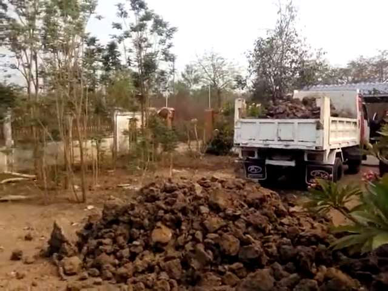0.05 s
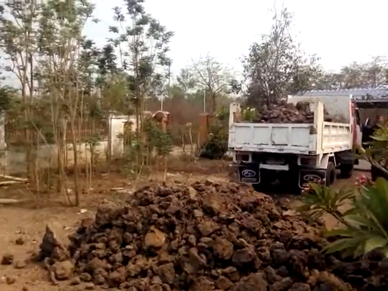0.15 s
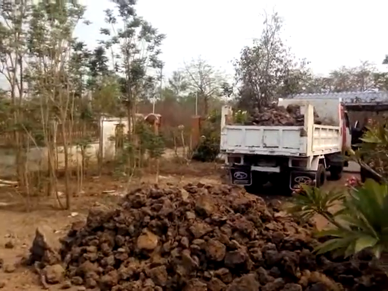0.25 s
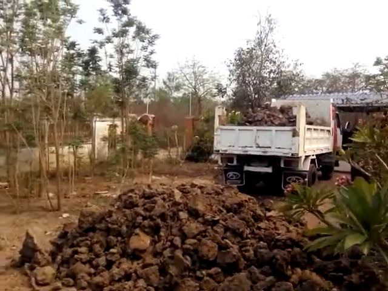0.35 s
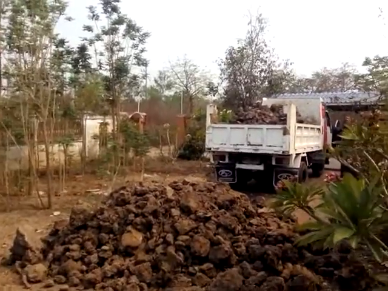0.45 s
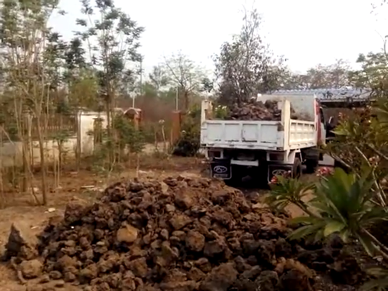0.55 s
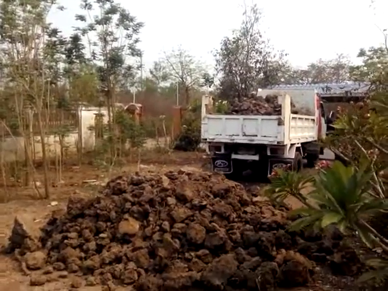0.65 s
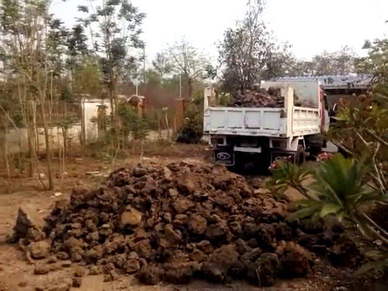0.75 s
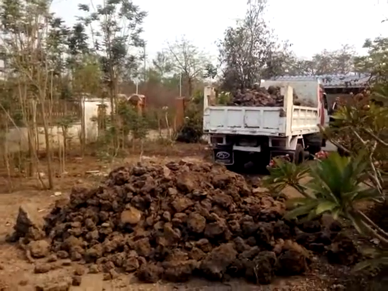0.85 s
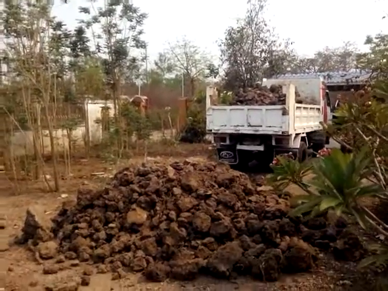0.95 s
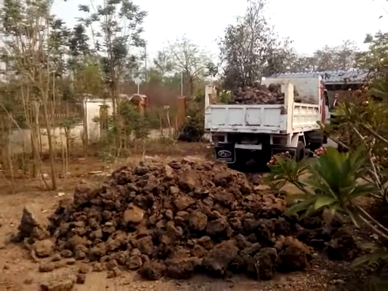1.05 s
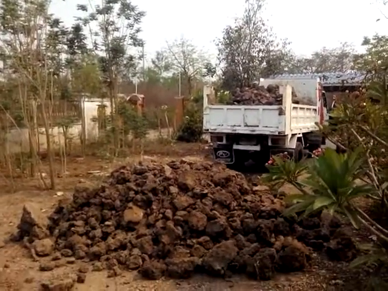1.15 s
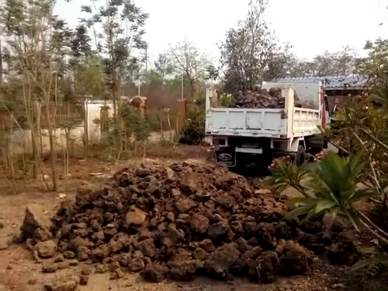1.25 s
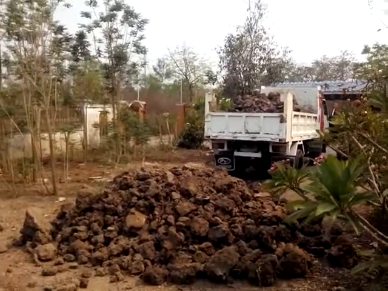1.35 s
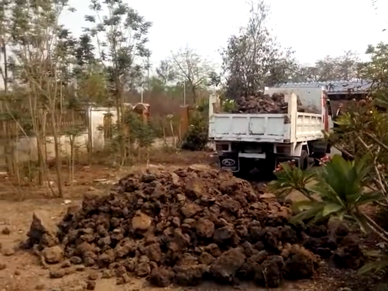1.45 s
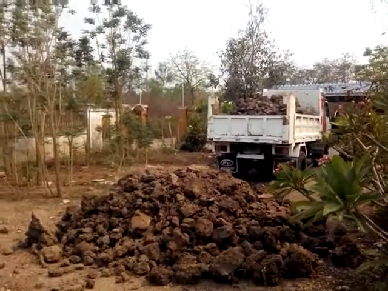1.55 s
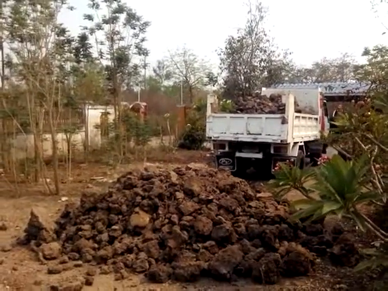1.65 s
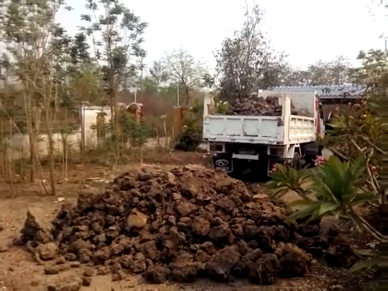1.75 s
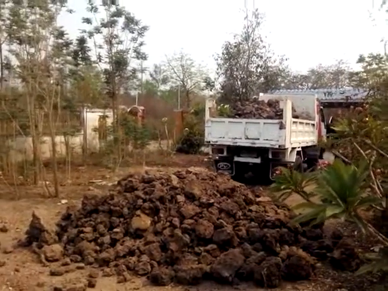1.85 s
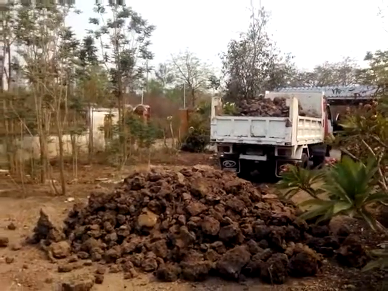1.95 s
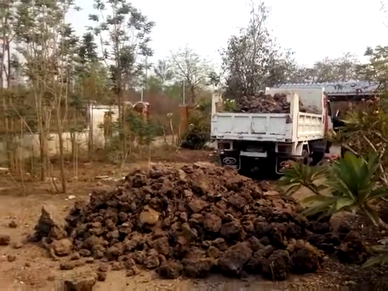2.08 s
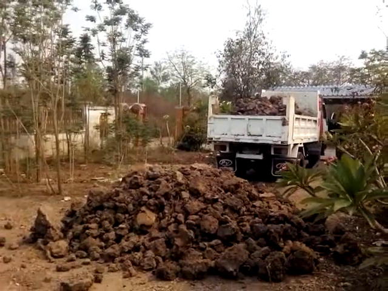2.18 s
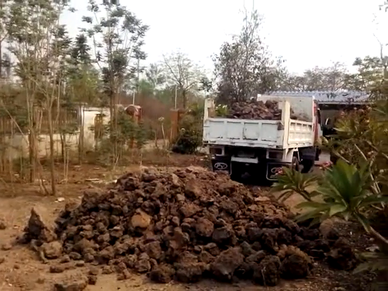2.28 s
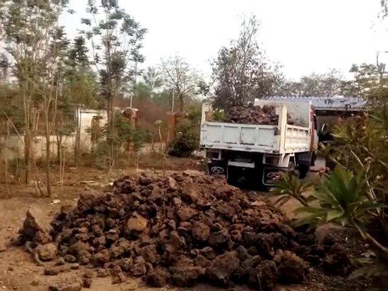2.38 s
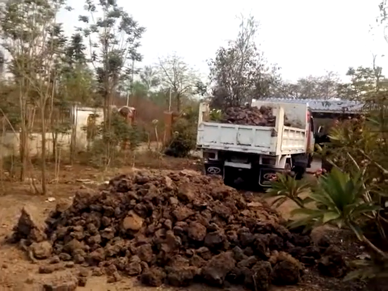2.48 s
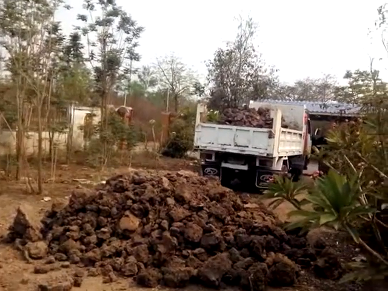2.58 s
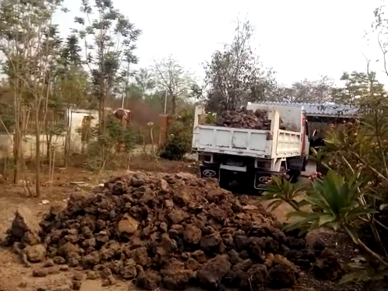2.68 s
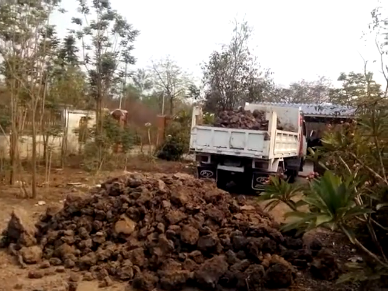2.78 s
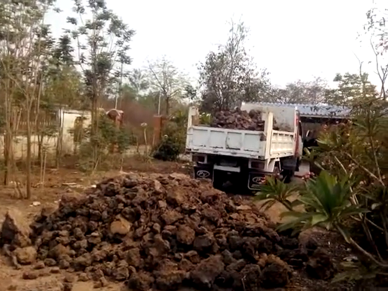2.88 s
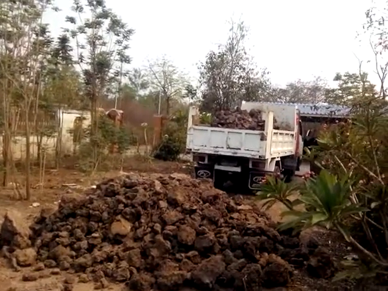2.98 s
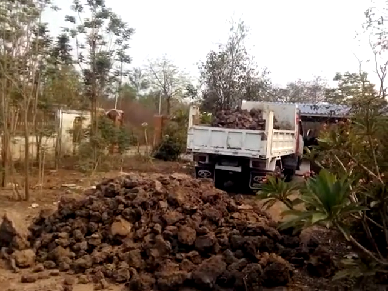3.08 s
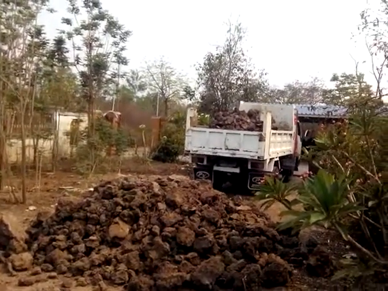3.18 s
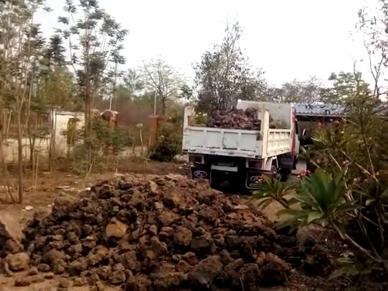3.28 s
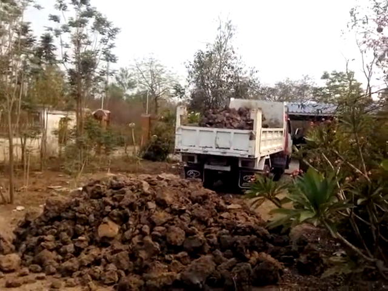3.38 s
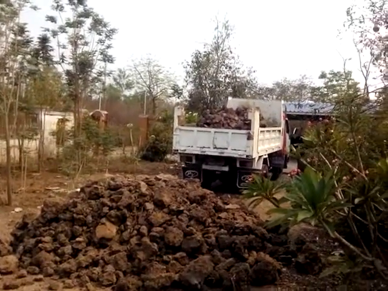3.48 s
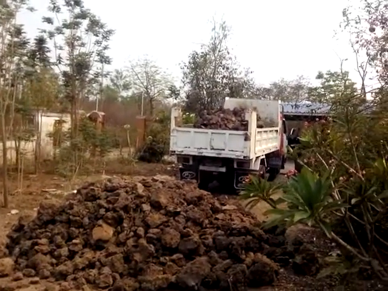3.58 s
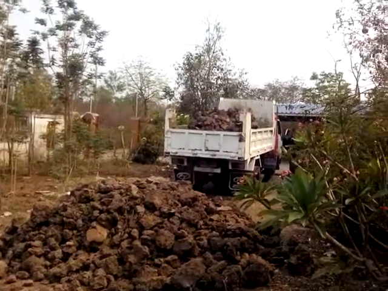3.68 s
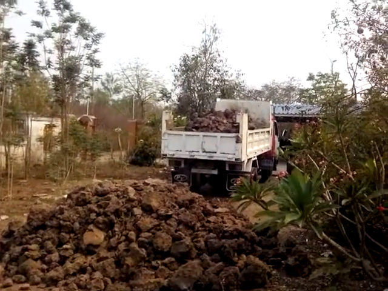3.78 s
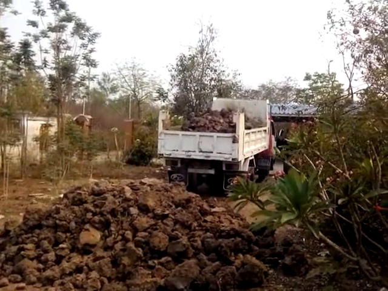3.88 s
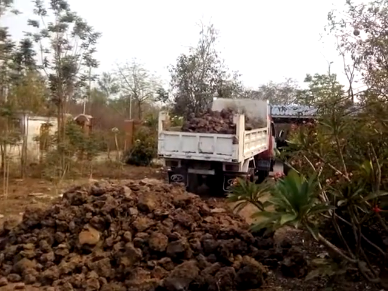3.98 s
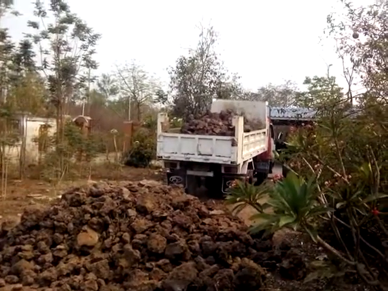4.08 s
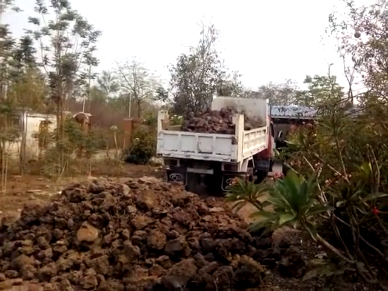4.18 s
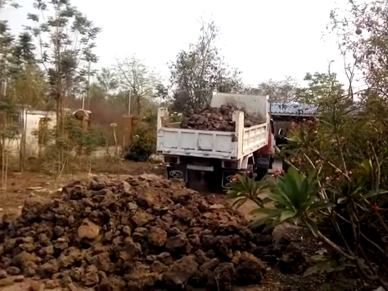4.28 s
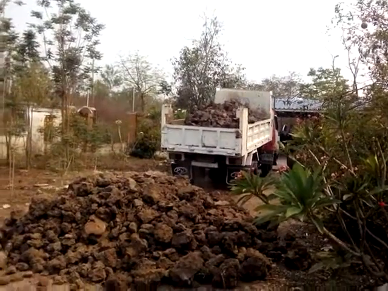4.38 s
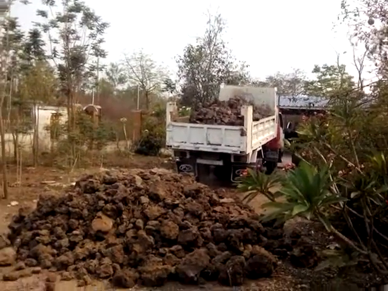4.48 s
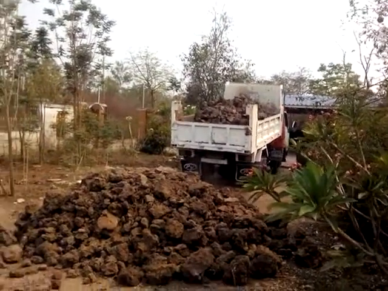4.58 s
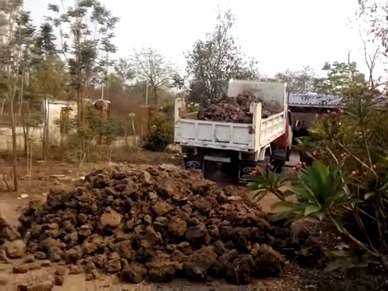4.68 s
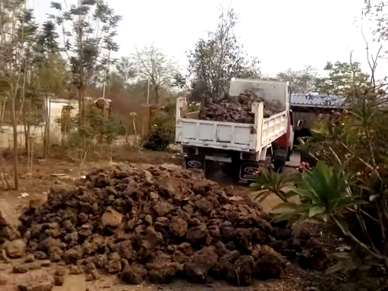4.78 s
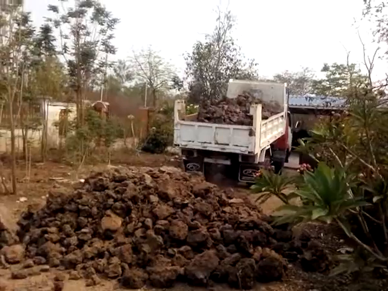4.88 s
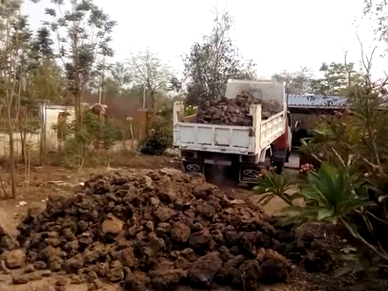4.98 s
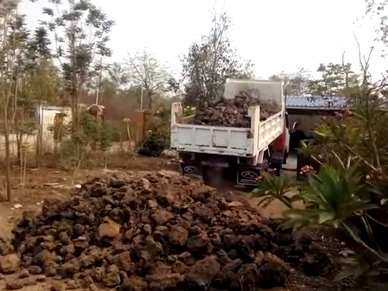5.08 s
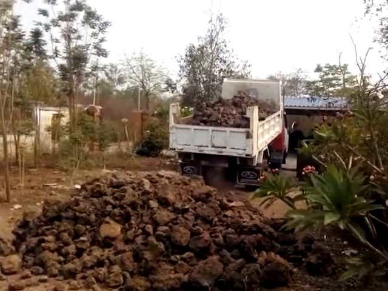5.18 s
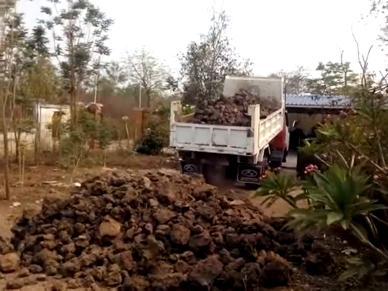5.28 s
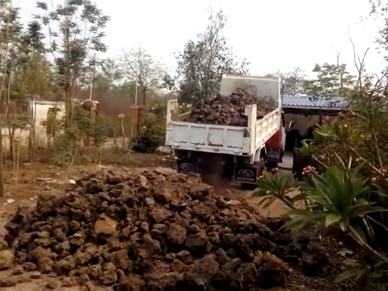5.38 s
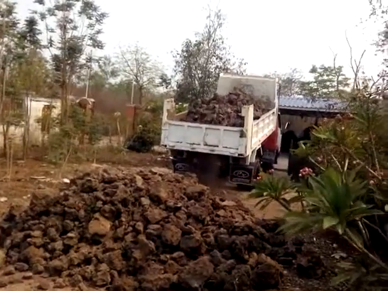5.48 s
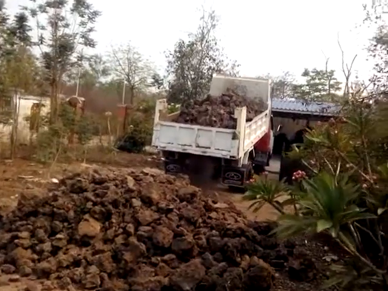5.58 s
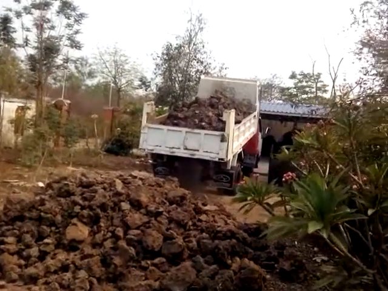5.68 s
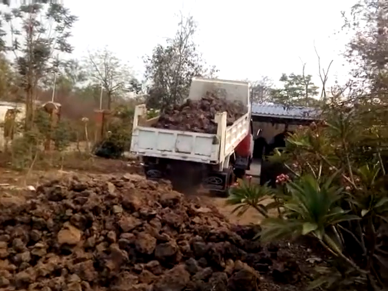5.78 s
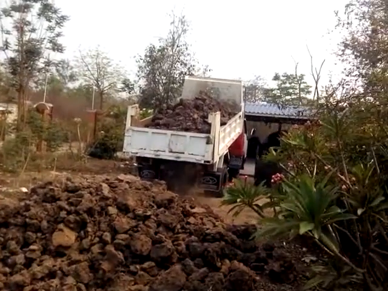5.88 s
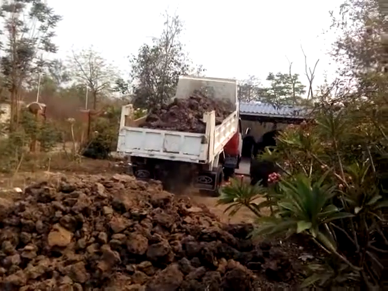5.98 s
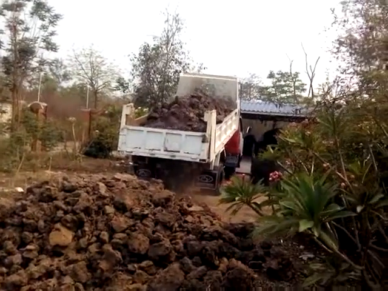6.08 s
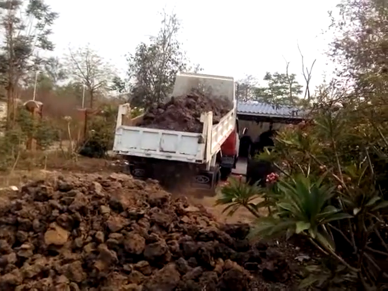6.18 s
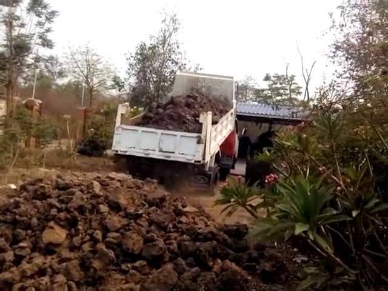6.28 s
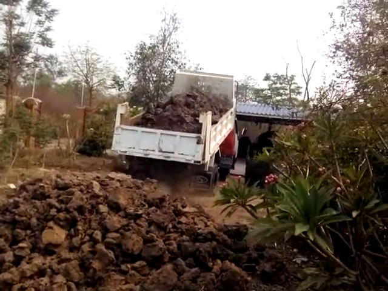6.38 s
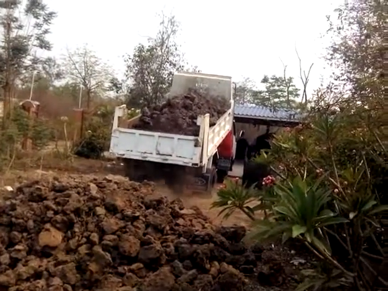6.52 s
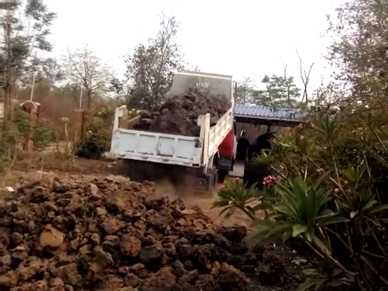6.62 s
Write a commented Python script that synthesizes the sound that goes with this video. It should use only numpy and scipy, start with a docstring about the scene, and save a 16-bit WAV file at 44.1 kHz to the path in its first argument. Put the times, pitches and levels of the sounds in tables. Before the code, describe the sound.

A dump truck's diesel engine runs some way off in an outdoor yard. It starts at a low, chugging idle, with a soft hiss for the first 0.7 seconds. The idle then lopes unevenly, with a faint pulsing squeak until about 1.4 seconds and small dry ticks near 1.1 and 1.9 seconds. Around 2 seconds the engine picks up slightly, with a few faint high swishes. From about 2.7 to 3.7 seconds it revs up strongly, growing louder and higher, while the steel bed gives a quick run of rattling knocks. The engine then holds a fast, booming drone with clatter and hiss as the bed lifts, creeping a little higher in pitch. Thin high buzzes come and go near 3.4 seconds, from 4.4 to 5.2, and from 5.9 on. One more metal knock comes near 5.1 seconds. The engine is still running hard at the end, about 6.6 seconds.

```python
"""Dump truck revving for its hoist

A six-cylinder diesel lopes at idle some way off in a yard, then revs up and holds speed for the hoist.
The exhaust booms on the first multiples of the firing rate; unequal cylinders chug between them.
The block clatters and hisses, and the loaded steel bed rattles as it starts to lift.
Broad hiss and sizzle open the scene; narrow buzzes come and go later."""
import sys
import numpy as np
from scipy import signal
from scipy.fft import rfft, irfft, next_fast_len
from scipy.io import wavfile
from scipy.ndimage import uniform_filter1d, minimum_filter1d, map_coordinates

SR = 44100
rng = np.random.default_rng(int(sys.argv[2]) if len(sys.argv) > 2 else 0)


def store_wav(level_fs):
    """Save 16-bit WAV to argv[1]."""
    pcm = np.round(np.clip(np.atleast_2d(level_fs), -1, 1) * 32767)
    wavfile.write(sys.argv[1], SR, pcm.T.astype(np.int16))


N = 293265
TIME = np.arange(N) / SR

# engine speed: t/s, firing rate/Hz
FIRING_RATE = [(0.0, 33.4), (0.15, 33.8), (0.39, 33.7), (0.5, 34.2), (0.96, 32.3), (1.61, 32.6),
               (1.8, 32.1), (2.02, 34.8), (2.15, 37.6), (2.26, 39.1), (2.74, 39.2), (3.02, 47.7),
               (3.15, 53.3), (3.35, 61.6), (3.46, 68.1), (3.59, 74.8), (3.7, 76.6), (4.56, 87.2),
               (4.74, 88.8), (5.0, 88.0), (5.3, 95.1), (5.68, 92.0), (5.87, 92.7), (6.65, 97.1)]
# engine effort: t/s, load (0 idle, about 1 full), chug gain/dB
EFFORT = [(.5, 0.043, -27.5), (.9, 0.023, -30), (1.82, 0.035, -29), (1.95, 0.3, -28.5), (2.15, 0.52, -21.5),
          (2.6, 0.67, -21.5), (2.85, 0.7, -15.5), (3.1, 1.03, -24), (3.28, 1.09, -18), (3.75, 0.87, -20.5),
          (4.6, 1.02, -17), (5.05, 1.12, -20.5), (5.3, 1, -22.5), (6, 1.046, -26), (6.65, 0.94, -21.5)]
# firing orders 1-6 ahead of the pipe: idle level/dB, full-load level/dB
ORDER_LEVELS = [(-32, -18.5), (-43, -20), (-47, -23), (-34, -24.5), (-48.5, -31.5), (-58.5, -31.5)]
# tailpipe and silencer: f/Hz, gain/dB
PIPE_RESPONSE = [(25, -36), (45, -18.5), (65, -2.5), (98, 8.5), (125, -4), (165, 2.5), (195, -4.5),
                 (235, -2), (275, -11.5), (315, -6), (385, -22.5), (465, -15.5), (540, -38), (900, -51.5)]
# standing waves in the pipe: f/Hz, width/Hz, gain/dB
PIPE_WAVES = [(52, 12, -16), (54.2, 49.8, 18.5), (87.16, 5.1, -7.5), (122.7, 7.2, -10), (141.1, 61, 13),
              (149.3, 9.2, -13.5), (176.5, 2.2, -4.5), (280, 10, 2.5), (350, 12, 8)]
# unequal cylinders, lines 1, 2 and 3 sixths of the firing rate off an order: gain/dB
IMBALANCE_DB = [-3.4, -9, 0.92]
# exhaust sag once per engine cycle: t/s, depth/dB
LOPE_DEPTH = [(.45, 1), (.9, 10), (1.7, 10.5), (2.1, 4), (3.3, 1), (4.9, -1), (5.4, 0.7)]
# combustion harshness: t/s, level/dB
KNOCK_LEVEL = [(0.0, -38), (0.18, -36), (0.67, -36), (0.85, -42.5), (2.8, -37), (2.83, -32.5), (3.15, -31),
               (3.33, -22), (3.37, -26.5), (3.59, -24), (3.7, -29), (4.41, -27), (4.44, -23), (5.18, -27),
               (5.35, -30.5), (6.15, -32), (6.63, -29.5), (6.65, -27)]
# block drone: f/Hz, level/dB
DRONE_SPECTRUM = [(60, -28), (250, 10), (440, -2), (550, -7), (660, -5.5), (770, -6.5), (900, -6),
                  (1150, -6), (1500, -6), (2100, -26.5), (4000, -62.5)]
# hollow chassis growl: f/Hz, level/dB
GROWL_SPECTRUM = [(520, -19), (690, 7.5), (880, 3.5), (1120, -27.5)]
# injection clatter: f/Hz, level/dB
CLATTER_SPECTRUM = [(700, -41.5), (1300, -21), (1650, -0.5), (1870, -4), (2050, 1), (2300, 2.5), (2650, 3),
                    (3100, 1), (3700, 2), (4300, -4), (5200, -12.5), (7500, -52.5)]
# fan hiss and swishes: f/Hz, level/dB
HISS_SPECTRUM = [(2500, -43), (3900, -13), (4600, 3), (5200, 1), (5900, -2.5), (6500, -6), (7200, -17.5),
                 (7800, -47.5)]
# sheet-metal resonances: f/Hz, width/Hz, gain/dB
PANEL_MODES = [(795, 5, 11), (873, 27, 1.5), (1798, 24, 9.5), (1910, 23, 8.5), (2206, 17, 4.5),
               (2400, 73, 3.5), (2720, 51, 1), (2640, 26, 1), (2815, 32, 7.5), (3120, 29, 7.5),
               (3330, 11, 10), (3540, 18, 2.5), (4280, 23, 8.5), (5630, 53, 4.5), (5980, 45, 7)]
# stereo width: f/Hz, side minus mid/dB
STEREO_WIDTH = [(100, -30), (300, -15.5), (500, -13), (900, -8.5), (1500, -7), (2500, -11.5), (3600, -5.5),
                (4400, 0.5), (5500, 2), (7200, 8)]
# stereo balance: f/Hz, left minus right/dB
STEREO_BALANCE = [(100, 8), (500, 0.5), (1500, 2), (2700, 2), (4200, 1.5), (5200, -7.5), (7200, -4)]
# bed and tailgate blows: t/s, level/dB
BED_BLOWS = [(1.668, -39.5), (2.263, -39), (2.823, -31.5), (2.865, -37), (2.961, -31), (3.194, -33),
             (3.229, -25.5), (3.296, -27), (3.328, -25), (3.394, -31), (3.481, -28.5), (5.141, -33)]
# bed steel: f/Hz, level/dB
STEEL_SPECTRUM = [(800, -33.5), (1500, -23), (1850, 3), (2100, 9.5), (2400, -6.5), (3100, 5.5), (4200, 1),
                  (6000, -12.5), (7500, -47.5)]
# fluttering noise, broad hiss and sizzle first, then narrow buzzes:
# start/s, end/s, f/Hz, width/Hz, level/dB
FLUTTER_BANDS = [(0, .72, 3820, 610, -45), (.05, 0.651, 5500, 990, -49.5), (1.297, 2.55, 794.5, 10, -53),
                 (2.17, 2.847, 425, 45, -47), (3.285, 3.62, 3080, 94, -34.5), (4.437, 5.22, 3015, 68, -42),
                 (6.25, 6.7, 2960, 250, -37.5), (5.897, 6.7, 3530, 310, -42.5)]
# high swishes: t/s, level/dB
SWISH_EVENTS = [(1.234, -41), (1.69, -46), (2.454, -41.5), (2.603, -42), (2.737, -42.5)]
# dry ticks: t/s, gain/dB
TICK_EVENTS = [(1.1033, -29), (1.92, -36.5)]
# modes of a tick: f/Hz, gain/dB, t60/s
TICK_RING = [(630, -13.5, .008), (1055, 12.5, 0.0062), (1370, -6, .008)]


def exhaust_boom(firings, rate_hz, load, waver_db=1.0, dispersion_rad=0.694):
    """Firing orders grow with load and glide through the pipe resonances."""
    total = np.zeros(N)
    for k, (idle_db, loaded_db) in enumerate(ORDER_LEVELS, 1):
        db = idle_db + load * (loaded_db - idle_db)
        db += along(PIPE_RESPONSE, k * rate_hz) + peaks_db(PIPE_WAVES, k * rate_hz)
        db += waver_db * np.sqrt(k) * wobble(21)
        lag_rad = dispersion_rad * (k - 1) ** 2  # the pipe delays higher orders, smearing each puff
        total += amp(db) * np.cos(2 * np.pi * k * (firings - .4) - lag_rad)
    return total


def exhaust_chug(firings, rate_hz, knock_db, scatter=.1, gas_db=-22):
    """Unequal puffs repeat every six firings: lines at sixths of the firing rate, over rushing gas."""
    pace = rate_hz / rate_hz.max()
    bark_db = 8.5 * (pace - 1) + 0.66 * knock_db  # fast, harsh puffs have sharper edges
    cycle = np.exp(2j * np.pi * firings / 6)
    phasor, lines = np.ones(N, complex), np.zeros(N)
    knots_s = np.linspace(0, TIME[-1], int(TIME[-1] * 16))
    for k in range(1, 46):
        phasor = phasor * cycle
        hz, offset = k * rate_hz / 6, min(k % 6, -k % 6)
        if offset:
            bark_share = along([(180, 0.27), (320, 0.96)], hz)
            db = IMBALANCE_DB[offset - 1] + along(PIPE_RESPONSE, hz) + bark_share * bark_db
            draws = rng.standard_normal(len(knots_s)) + 1j * rng.standard_normal(len(knots_s))
            drift = scatter / pace * np.interp(TIME, knots_s, draws)  # slow puffs vary more
            strength = np.exp(2j * np.pi * rng.random()) + drift
            lines += amp(db) * np.real(strength * phasor)
    lines /= np.sqrt(np.abs(uniform_filter1d(lines ** 2, SR // 3)))
    gas = unit(filtered(rng.standard_normal(N), lambda hz: amp(along(PIPE_RESPONSE, hz))))
    return lines + amp(gas_db) * gas


def stumble(firings, weakest_firing=1.57):
    """Pulse from 0 to 1 every six firings, at the weakest cylinder."""
    return np.abs(np.cos(np.pi * (firings - weakest_firing) / 6)) ** 2.5


def lope(firings):
    """Exhaust gain, mean near 1, sagging with the stumble; deepest at slow idle."""
    depth_db, = curves(LOPE_DEPTH)
    gain = amp(-depth_db * stumble(firings))
    return gain / uniform_filter1d(gain, SR // 2)


def combustion_beat(firings, rate_hz, decay_s=0.025, scatter_db=0.5, steady_share=0.5):
    """Envelope of one burst per firing over a steady floor; bursts merge at speed."""
    age_s = firings % 1 / rate_hz
    sizes = amp(scatter_db * rng.standard_normal(int(firings[-1]) + 1))
    power = (sizes[firings.astype(int)] * np.exp(-age_s / decay_s)) ** 2
    power /= np.abs(uniform_filter1d(power, SR // 4)) + 1e-9
    return np.sqrt(steady_share + (1 - steady_share) * power)


def engine_bay(firings, rate_hz, knock_db, cruise_hz=80):
    """Block drone, chassis growl, injection clatter and fan hiss, all growing with the knock."""
    octaves = np.log2(rate_hz / cruise_hz)
    beat = combustion_beat(firings + .7, rate_hz)
    drone = amp(-34 + 0.67 * knock_db + 0.1 * octaves) * panel_noise(DRONE_SPECTRUM)
    growl = amp(-40.5 + 0.67 * knock_db + 5.5 * octaves) * panel_noise(GROWL_SPECTRUM)
    jitter_db = 1.2 * wobble(220)  # valves and linkages tick unevenly
    clatter = amp(-32 + 0.85 * knock_db + 0.6 * wobble(25) + jitter_db) * panel_noise(CLATTER_SPECTRUM)
    hiss = amp(-41 + 0.8 * knock_db + .5 * jitter_db) * panel_noise(HISS_SPECTRUM)
    return beat * (drone + growl + clatter) + np.sqrt(beat) * hiss


def bed_rattle(crack_t60_s=.03, rattle_t60_s=.12):
    """Loose steel knocks: a sharp crack, then a short bright rattle."""
    envelope = np.zeros(N)
    for start_s, db in BED_BLOWS:
        age_s = np.abs(TIME - start_s)
        crack = 1.1 * amp(-60 * age_s / crack_t60_s)
        rattle = amp(-60 * age_s / rattle_t60_s)
        envelope += (TIME >= start_s) * amp(db) * (crack + rattle)
    return envelope * panel_noise(STEEL_SPECTRUM)


def flutter_band(start_s, end_s, centre_hz, width_hz, db, fade_s=.02, flutter_db=2.2):
    """Band of fluttering noise: hiss or sizzle when broad, a buzz when narrow."""
    shape = lambda hz: 1 / (1 + (2 * (hz - centre_hz) / width_hz) ** 2)
    band = unit(filtered(rng.standard_normal(N), shape))
    gate = np.clip(np.minimum(TIME - start_s, end_s - TIME) / fade_s + .5, 0, 1)
    return gate * amp(db + flutter_db * wobble(30)) * band


def mount_squeak(firings):
    """A mount squeaks with each stumble at slow idle."""
    squeak = flutter_band(start_s=.72, end_s=1.42, centre_hz=2590, width_hz=120, db=-46.5)
    return stumble(firings) * squeak


def swishes(sigma_s=.018):
    """Brief swells of high rustle as the engine leaves idle."""
    envelope = sum(amp(db) * np.exp(-.5 * ((TIME - at_s) / sigma_s) ** 2) for at_s, db in SWISH_EVENTS)
    return envelope * panel_noise(HISS_SPECTRUM)


def ticks():
    """Small, heavily damped clicks close by."""
    t = np.arange(SR // 20) / SR
    ring = sum(amp(db - 60 * t / t60_s) * np.sin(2 * np.pi * hz * t) for hz, db, t60_s in TICK_RING)
    blows = np.zeros(N)
    for at_s, db in TICK_EVENTS:
        blows[round(at_s * SR)] = amp(db)
    return signal.fftconvolve(blows, ring)[:N]


def panel_noise(spectrum):
    """Stereo noise coloured by sheet metal; mid at rms 1, wider in the treble."""
    def colour(hz):
        mid_side = amp(np.outer([0, 1], along(STEREO_WIDTH, hz)))
        return amp(along(spectrum, hz) + peaks_db(PANEL_MODES, hz)) * mid_side

    mid, side = filtered(rng.standard_normal((2, N)), colour)
    balance = lambda hz: amp(np.outer([.5, -.5], along(STEREO_BALANCE, hz)))
    pair = filtered(np.array([mid + side, mid - side]), balance)
    return pair / np.std(pair.mean(axis=0))


def amp(db):
    """dB to gain."""
    return 10 ** (np.asarray(db) / 20)


def unit(x):
    """Scale to rms 1."""
    return x / np.sqrt(np.mean(x ** 2) + 1e-20)


def along(points, hz):
    """Interpolate (f/Hz, value) points on a log axis."""
    knots_hz, values = np.transpose(points)
    return np.interp(np.log(hz + 1), np.log(knots_hz + 1), values)


def peaks_db(rows, hz):
    """Summed resonance peaks and dips."""
    return sum(db / (1 + (2 * (hz - centre_hz) / width_hz) ** 2) for centre_hz, width_hz, db in rows)


def curves(rows):
    """Per-sample curve for each column after t/s."""
    knots_s, *columns = np.transpose(rows)
    return [np.interp(TIME, knots_s, column) for column in columns]


def wobble(knot_hz):
    """Smooth random curve."""
    return map_coordinates(rng.standard_normal(int(N * knot_hz / SR) + 4), [TIME * knot_hz])


def filtered(x, response):
    """Zero-phase filter of gain response(hz)."""
    size = 2 * next_fast_len(N // 2 + SR // 4)
    return irfft(rfft(x, size) * response(np.fft.rfftfreq(size, 1 / SR)), size)[..., :N]


def scene():
    """The crankshaft drives exhaust and engine bay together; small noises sit on top."""
    rate_hz, = curves(FIRING_RATE)
    load, chug_db = curves(EFFORT)
    knock_db = curves(KNOCK_LEVEL)[0] + 30  # re the usual knock, -30 dB
    firings = np.cumsum(rate_hz) / SR
    chug = amp(chug_db) * exhaust_chug(firings, rate_hz, knock_db)
    boom = exhaust_boom(firings, rate_hz, load)
    exhaust = lope(firings) * (boom + chug) * amp([[.3], [-.3]])
    bed = bed_rattle()
    bands = mount_squeak(firings) + sum(flutter_band(*row) for row in FLUTTER_BANDS)
    bay = engine_bay(firings, rate_hz, knock_db)
    return exhaust + bay + bed + bands * amp([[1.1], [-1.1]]) + swishes() + ticks()


def record(dry, ceiling=.96, top_hz=7838):
    """Smooth peak limiter, then a brick-wall low-pass."""
    needed = np.minimum(1, ceiling / (np.abs(dry).max(axis=0) + 1e-9))
    gain = uniform_filter1d(minimum_filter1d(needed, SR // 100), SR // 100)
    return filtered(dry * gain, lambda hz: hz < top_hz)


dry = scene()
out = record(dry)
store_wav(out)
```